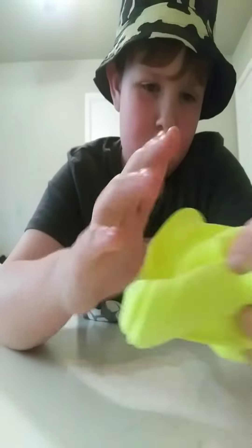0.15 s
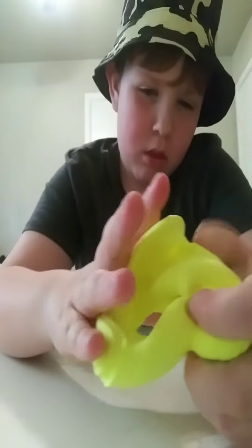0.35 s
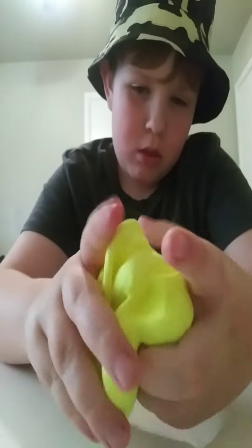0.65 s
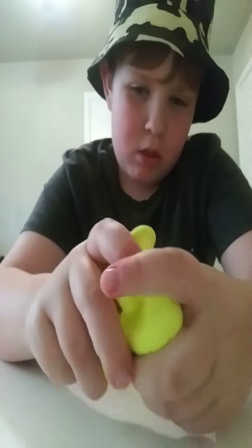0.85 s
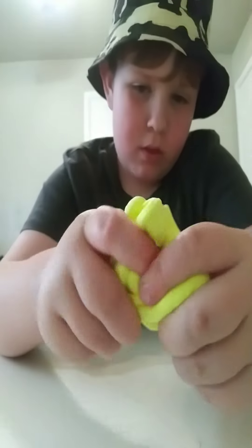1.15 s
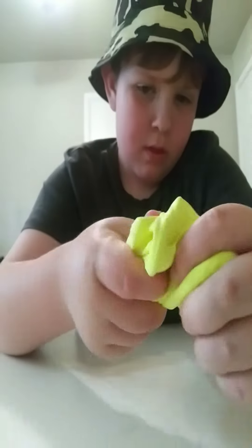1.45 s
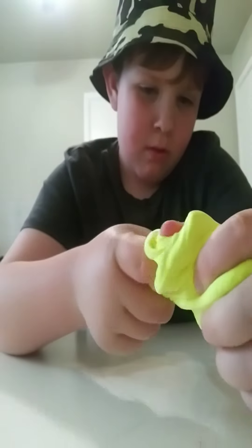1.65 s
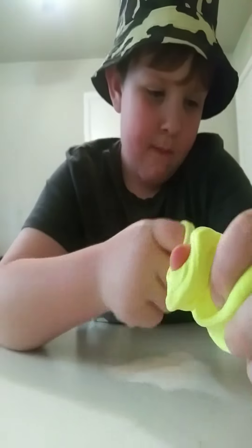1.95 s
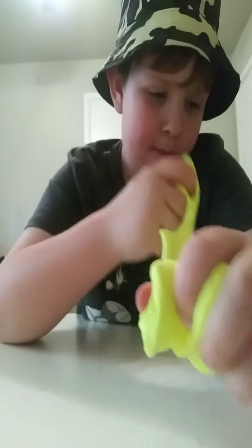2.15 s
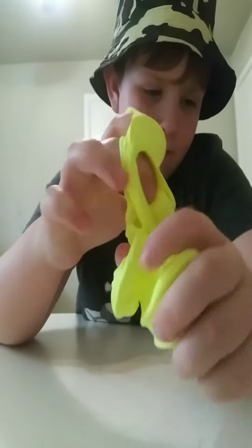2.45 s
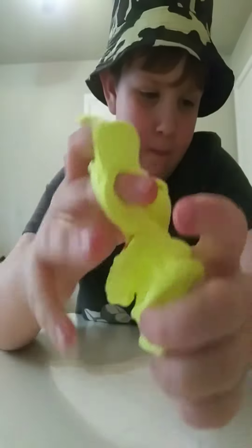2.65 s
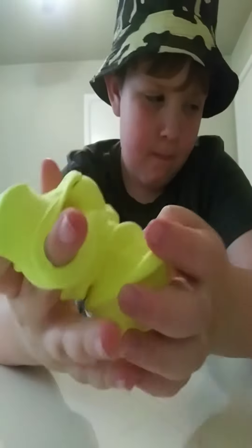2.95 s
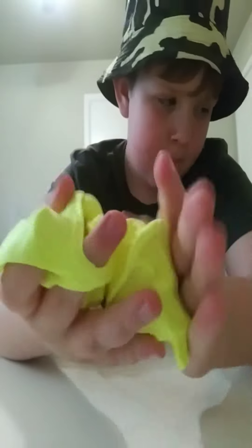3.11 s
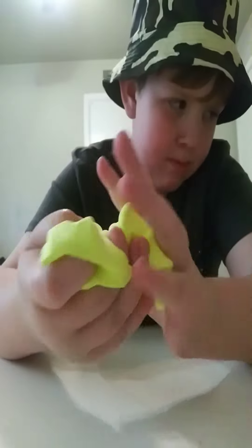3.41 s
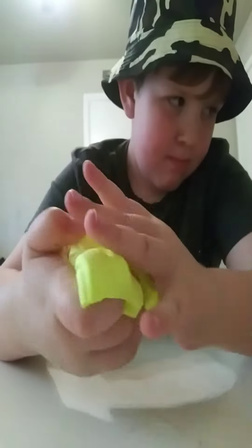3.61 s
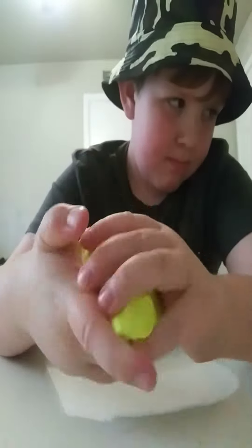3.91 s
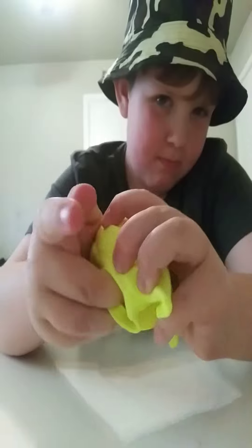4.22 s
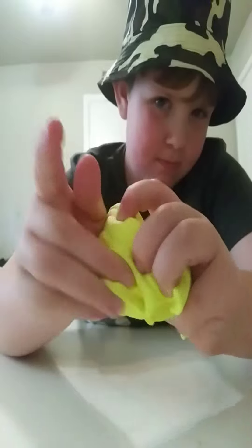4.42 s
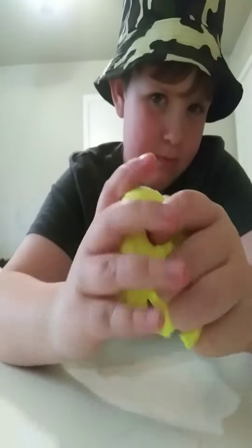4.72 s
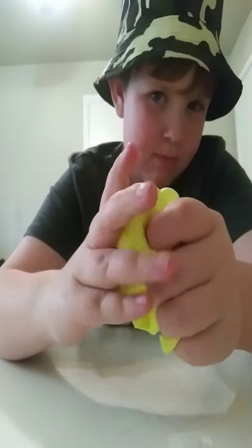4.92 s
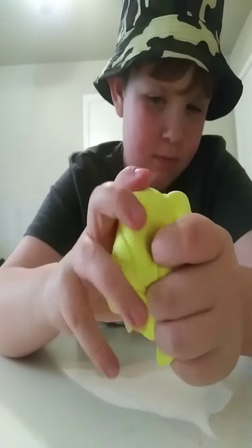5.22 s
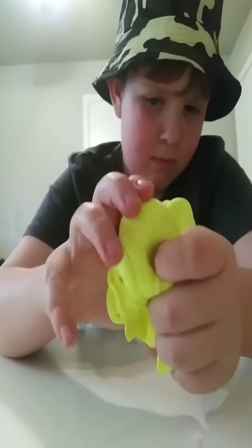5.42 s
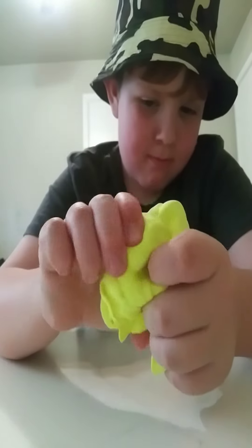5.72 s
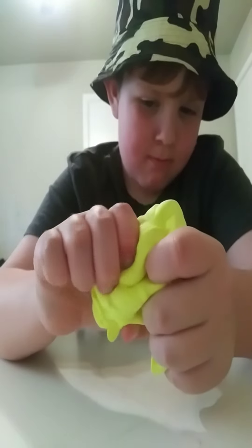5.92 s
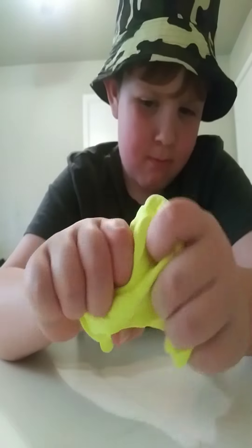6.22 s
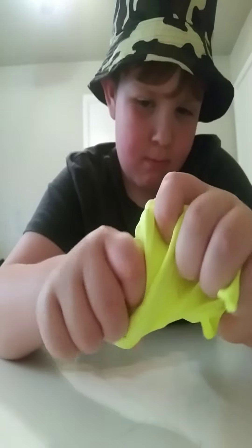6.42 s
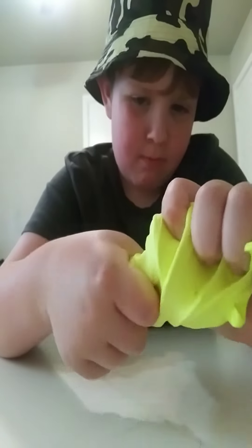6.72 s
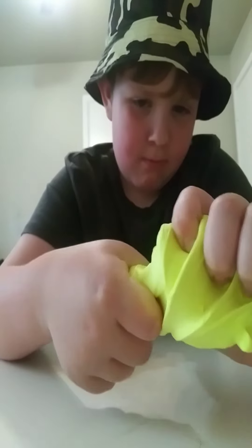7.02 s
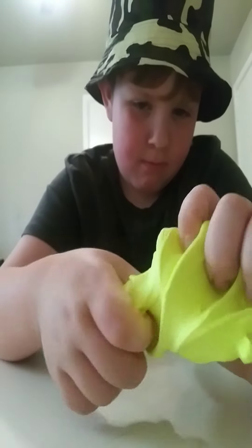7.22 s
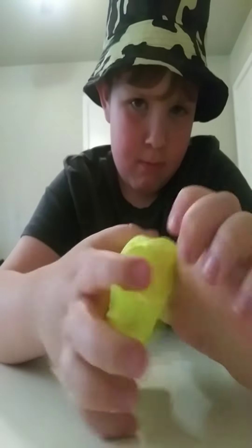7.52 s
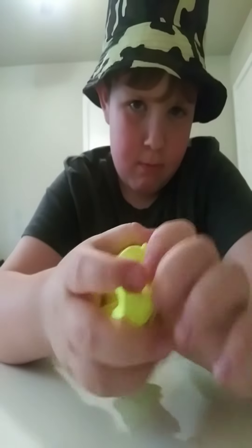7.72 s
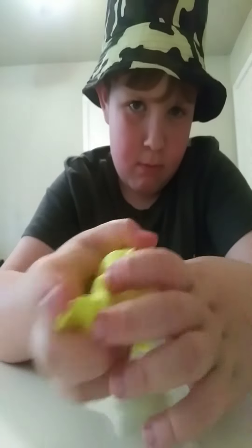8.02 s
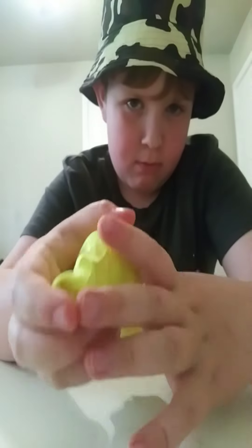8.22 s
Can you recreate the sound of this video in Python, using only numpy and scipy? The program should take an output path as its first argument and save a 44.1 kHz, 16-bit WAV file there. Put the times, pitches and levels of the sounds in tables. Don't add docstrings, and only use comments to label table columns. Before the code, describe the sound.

Hands knead a soft wet lump of slime on a table, with deep muffled thuds, dull wet slaps and small pops, very close.

```python
import sys
import numpy as np
from scipy import signal
from scipy.fft import rfft, irfft
from scipy.io import wavfile
from scipy.ndimage import uniform_filter1d

SR = 44100
rng = np.random.default_rng(int(sys.argv[2]) if len(sys.argv) > 2 else 0)


def transcribe(u):
    v = np.clip(np.atleast_2d(u).T, -1, 1)
    q = np.round(v * 32767).astype(np.int16)
    wavfile.write(sys.argv[1], SR, q)


def invert_db(x):
    u = np.asarray(x, float) / 20
    return 10 ** u


N = 368233

# (time [s], peak level [dB], pitch [Hz], room level [dB])
NUDGES = [(.009, -45.5, 87, -2.5), (0.375, -50.5, 88, -8), (0.538, -49.5, 88.5, -7.5),
          (0.721, -44.5, 94.3, -7.5), (.797, -39.5, 88, -6), (1.185, -40, 70, 0), (1.438, -39, 95, -5),
          (1.775, -47.5, 103, -9), (1.93, -51, 100, -20), (2.0626, -31, 75.3, -2), (2.158, -43, 106, -2),
          (2.29, -40.5, 97.4, -7), (3.255, -38.5, 89.6, -2.5), (3.601, -36, 77.4, -3),
          (4.024, -43, 85.4, -9), (4.109, -41, 79, -7), (4.44, -42, 93, -6.5), (5.468, -43.5, 103, -1),
          (5.506, -36, 64.4, -6.5), (5.577, -38.5, 82, -18), (5.748, -43.5, 93, -11), (6.03, -43, 86, -7),
          (6.102, -46, 83, -4.5), (6.249, -50, 71, -24), (6.331, -49, 99, -2), (6.467, -41, 91.5, -18),
          (6.588, -44.5, 88.4, -10), (6.927, -37.5, 90.5, -4), (7.329, -37, 74.98, -9),
          (7.597, -44, 100.6, -18)]
# (time [s], peak level [dB], pitch [Hz], room level
# [dB])
BUMPS = [(0.223, -35, 106, -7), (0.897, -52, 131, -27), (1.238, -34, 87.4, -4), (1.291, -32, 116.7, -10.5),
         (1.702, -39.5, 98.6, -11), (2.105, -32, 81, -6), (2.866, -36, 90.9, 1.5),
         (2.922, -29.5, 107.7, -18.5), (3.163, -34, 116.6, -4.5), (3.664, -28, 102, -12),
         (4.6, -38.5, 90, -17), (4.63, -16.5, 99.5, -22), (4.695, -39, 127.3, 3.5), (4.814, -25, 101, -14),
         (5.026, -29.5, 113, -12.5), (5.201, -48.5, 82, -8), (6.525, -34.5, 101, -12.5),
         (6.7216, -17, 84.5, -12.5), (6.7723, -26, 107, -19.5), (6.849, -36.5, 94.3, -11.5),
         (7.295, -51.5, 90, -9), (5.37, -55.5, 61.4, -3), (7.405, -29.5, 88.4, -13),
         (7.436, -32.5, 97.6, -10), (7.537, -27.5, 102, -13.5), (7.889, -52, 72.4, -15),
         (8.15, -54, 80, -6)]
# (time [s], peak level [dB], pitch [Hz], swell time [s])
KNOCKS = [(.227, -37.5, 240, 0.01), (.874, -54, 167, 0.012), (.915, -35, 192, 0.0062),
          (1.242, -38, 196, 0.0051), (1.295, -29.5, 215, 0.0056), (1.368, -47.5, 167, 0.011),
          (1.699, -48.5, 214, 0.0088), (1.779, -65, 250, .008), (2.114, -42, 170, .006),
          (2.868, -34, 203, 0.006), (2.927, -33, 240, 0.0099), (3.159, -24.5, 170, .0043),
          (3.668, -41, 225, 0.011), (4.634, -23.5, 231.6, 0.0082), (4.702, -32.5, 172.5, 0.0042),
          (4.758, -46, 166, .006), (4.822, -32, 233, 0.0067), (4.931, -57, 178, .0054),
          (5.027, -37, 240, 0.008), (6.529, -38.5, 167, 0.0041), (6.726, -23.5, 219, 0.0065),
          (6.776, -27.5, 221, 0.0075), (6.797, -43, 237, 0.0091), (6.853, -50.5, 165, .006),
          (7.093, -51, 219, 0.01), (7.409, -40.5, 240, 0.013), (7.44, -41, 170, 0.0047),
          (7.541, -32.5, 241, 0.0085), (7.894, -47.5, 240, 0.0082)]
NUDGE_SWELL_S, BUMP_SWELL_S = 0.012, 0.013
ROCK_HZ, ROCK_DB, ROCK_SWELL_S = 49.3, -15.5, 0.024
KNOCK_ROOM_DB, DRIER_PER_DB, CARRY_DB_PER_OCT = -10.5, 0.18, 3.5

# (time [s], peak level [dB], lowest mode [Hz],
# reach above it [octaves], room level [dB])
SLAPS = [(.002, -54, 371, 2.5, -5), (.916, -47.5, 387, .1, -27), (1.295, -41, 347, .15, -6.5),
         (2.033, -49, 397, .3, -1.5), (2.16, -49, 480, 0.36, -6.5), (2.871, -45, 315, 0.27, -11),
         (2.926, -50.5, 325, 0.46, -14), (3.162, -35, 370, .2, -11.5), (3.668, -55, 312, .3, -10),
         (4.633, -41, 365, 1.86, -10), (4.822, -49, 340, .3, -21), (5.027, -54, 366, .3, -15),
         (6.727, -31.5, 358, 2.5, -11.5), (6.774, -49.5, 357, 0.51, -0.5), (7.543, -55, 366, 0.64, -13)]
# (ratio to lowest mode [1], level [dB], swell time [s])
LUMP_MODES = [(1, 1.5, 0.0043), (2, -3.5, 0.0031), (2.44, -3.5, 0.0042), (3.3, -10.5, 0.0027),
              (4.27, -15, 0.0011), (5.3, -10, 0.0018), (7.65, -33, 0.0038)]
# (time [s], peak level [dB], pitch [Hz], room level
# [dB])
POPS = [(.2932, -68, 1900, -2), (.2947, -73, 1360, 4), (1.295, -45.5, 514, -26),
        (4.6318, -54.5, 1380, -3.5), (6.727, -59.5, 1585, 1), (2.033, -47.5, 906, -8), (2.16, -46, 600, -7),
        (2.161, -48, 874, -5), (2.927, -71, 740, -11), (4.633, -68.5, 1900, -11), (4.816, -61.5, 734, -5),
        (5.026, -58, 810, -10), (7.539, -56.5, 820, -18), (.001, -63, 1480, -3), (2.898, -74, 1090, -8),
        (3.161, -36.5, 518, -22), (3.162, -41, 277, 5), (6.728, -66, 2850, -14.5), (4.633, -35.5, 790, -10),
        (3.162, -61, 810, 2), (6.524, -69, 1150, -5.5), (6.529, -53.5, 595, -14), (2.871, -72, 853, -8),
        (7.435, -69, 860, 1), (7.896, -62.5, 2180, -2), (7.9004, -67, 2600, -6), (7.9009, -55, 1740, -8),
        (7.9009, -57, 2050, -10), (7.9144, -61, 1940, -19), (7.9394, -65, 2000, -10)]
# (time [s], peak level [dB], pitch [Hz],
# swell time [s])
SQUEAKS = [(.312, -74, 1820, 0.0096), (1.107, -74.5, 1510, 0.011), (1.143, -78.5, 1570, .018),
           (1.148, -58, 614, 0.01), (1.19, -68, 580, .012), (1.815, -68.5, 950, 0.0096),
           (1.913, -66, 450, 0.0054), (2.015, -73, 770, 0.0072), (2.048, -60.5, 940, 0.0096),
           (2.171, -59, 910, 0.009), (2.87, -66, 693, 0.013), (3.421, -74, 1090, .0054),
           (7.555, -63, 860, 0.0069), (3.362, -68, 1740, .006), (2.157, -67.5, 1626, 0.0057),
           (3.362, -63, 1150, 0.0094), (6.703, -58.5, 950, .0054), (6.71, -47, 1100, .007),
           (6.711, -57.5, 1640, .0049), (6.712, -62, 1970, 0.011), (6.742, -53, 1100, 0.0094),
           (6.772, -53.5, 650, .0087), (6.8, -75, 1940, 0.0075), (6.76, -68, 1550, .006),
           (6.828, -66, 946, 0.0054), (6.54, -64.5, 640, 0.01), (4.632, -35.5, 340, 0.0087),
           (3, -66, 440, 0.013), (7.8954, -63, 1266, 0.012), (7.925, -62, 1830, 0.0065)]
BEYOND_DB_PER_OCT = -41
WETTER_DB_PER_OCT = 1.5
POP_SWELL_S, POP_QUICKER = 0.0034, 0.14
SQUEAK_ROOM_DB = -7.5
SOFTNESS = 4

# (time [s], shake level [dB])
LEAN = [(0.0, -62), (1.23, -60), (1.35, -57), (2.0, -57.5), (2.23, -47.5), (2.42, -60), (2.86, -61),
        (3.14, -54.5), (3.42, -55), (4.47, -62.5), (4.84, -47), (5.28, -60), (6.42, -59.5), (6.77, -52),
        (7.28, -60.5), (7.49, -60), (7.84, -63), (8.35, -58)]
# (pitch [Hz], width [Hz], level [dB])
LOW_MODES = [(60.5, 25, -3.5), (96.6, 17.3, -5), (123.8, 18, -10), (170, 13.6, -11.5)]
# (pitch [Hz], width [Hz], level [dB])
UPPER_MODES = [(240, 21, 4.5), (303.5, 83, -5), (335, 34, -9), (435, 120, -13.5)]
UNEVEN_DB = [
    [4.5],
    [4],
]
UPPER_DB, UPPER_FOLLOW = -20.5, 0.43
OPENING_DB, OPENING_FALL_DB_PER_S = -32, 241

# (frequency [Hz], time to fall 60 dB [s])
ROOM_DECAY = [(60, 0.64), (250, 0.21), (800, 0.27), (2000, 0.25), (6000, 0.26)]
WALL_S, WALL_SPREAD_S = 0.063, 0.014
# (frequency [Hz], density [dB per Hz])
HISS = [(120, -20), (200, -8.5), (215, -3), (253, -14), (399, -14), (617, -16), (3110, -23), (7440, -25),
        (14600, -25), (15400, -26)]
HISS_DB = -76
LOW_CUT_HZ, EDGE_HZ = 61, 15500


def evened(x):
    return x / np.sqrt(np.mean(x ** 2) + 1e-20)


def read(points, hz):
    f, value = np.transpose(points)
    return np.interp(np.log(hz + 1), np.log(f + 1), value)


def add(mix, s, sound):
    part = mix[max(round(s * SR), 0):][:len(sound)]
    part += sound[:len(part)]


def ring(hz, swell, order):
    t = np.arange(SR // 4) / SR
    u = t / np.clip(swell, 0.0006, 0.04)
    envelope = (u * np.exp(1 - u)) ** order
    return -envelope * np.sin(2 * np.pi * hz * t)


def room(x, gap, build, wall):
    taps = np.zeros(SR // 2)
    at = np.arange(0, len(taps) - 20, 20)
    taps[at + rng.integers(0, 20, len(at))] = rng.choice([-1., 1.], len(at))
    hz, t, z = signal.stft(taps, SR, nperseg=512)
    decay = invert_db(-60 * t / read(ROOM_DECAY, hz)[:, None])
    tail = signal.istft(z * decay, SR, nperseg=512)[1]
    t = np.arange(len(tail)) / SR
    onset = np.clip((t - gap) / build, 0, 1)
    answer = 1 + wall * np.exp(-((t - WALL_S) / WALL_SPREAD_S) ** 2)
    tail = tail * onset * answer
    return signal.fftconvolve(x, tail / np.linalg.norm(tail))[:N]


def struck(events, softness, brief, gap, build, wall):
    direct, late = np.zeros(N), np.zeros((3, N))
    for k, (s, peak_db, hz, swell, room_db) in enumerate(events):
        add(direct, s, invert_db(peak_db + 1.0) * ring(hz, swell, softness))
        airborne = ring(hz, brief * swell, softness)
        add(late[k % 3], s, invert_db(peak_db + room_db + 3.5) * airborne)
    return direct + sum(room(x, gap, build, wall) for x in late)


def table():
    thuds = [(s, db, hz, NUDGE_SWELL_S, room_db) for s, db, hz, room_db in NUDGES]
    thuds += [(s, db, hz, BUMP_SWELL_S, room_db) for s, db, hz, room_db in BUMPS]
    rocking = [(s, db + ROCK_DB, ROCK_HZ, ROCK_SWELL_S, room_db) for s, db, _, _, room_db in thuds]
    knocks = []
    for s, db, hz, swell in KNOCKS:
        room_db = KNOCK_ROOM_DB - DRIER_PER_DB * (db + 32.5) + CARRY_DB_PER_OCT * np.log2(hz / 240)
        knocks.append((s, db, hz, swell, room_db))
    low = struck(thuds + rocking, 3.12, brief=0.63, gap=0.013, build=0.023, wall=1.0)
    return low + struck(knocks, SOFTNESS, brief=0.49, gap=0.0069, build=0.017, wall=0.45)


def lump():
    slaps = []
    for s, db, hz, reach, room_db in SLAPS:
        for ratio, mode_db, swell in LUMP_MODES:
            octaves = np.log2(ratio)
            level_db = db + mode_db + BEYOND_DB_PER_OCT * max(octaves - reach, 0)
            slaps.append((s, level_db, hz * ratio, swell, room_db + WETTER_DB_PER_OCT * octaves))
    pops = [(s, db, hz, POP_SWELL_S * (800 / hz) ** POP_QUICKER, room_db) for s, db, hz, room_db in POPS]
    squeaks = [(*row, SQUEAK_ROOM_DB) for row in SQUEAKS]
    return struck(slaps + pops + squeaks, SOFTNESS, brief=0.57, gap=0.0009, build=0.0017, wall=0.5)


def modes(x, resonances):
    hz, spectrum = np.fft.rfftfreq(len(x), 1 / SR), rfft(x)
    gain = sum(invert_db(db) / (1 + 2j * (hz - f) / width) ** 2 for f, width, db in resonances)
    return evened(irfft(spectrum * gain, len(x)))


def lean():
    t = np.arange(N) / SR
    low_db = np.interp(t, *np.transpose(LEAN))
    upper_db = UPPER_DB - (1 - UPPER_FOLLOW) * (low_db + 59.5)
    low_db = np.maximum(low_db, OPENING_DB - OPENING_FALL_DB_PER_S * t)
    drift = evened(uniform_filter1d(rng.standard_normal(N), 1500))
    pushes = rng.standard_normal((2, N)) * invert_db(np.array(UNEVEN_DB) * drift)
    tremble = modes(pushes[0], LOW_MODES) + invert_db(upper_db) * modes(pushes[1], UPPER_MODES)
    settle = 1 - 0.75 * np.exp(-t / 0.006)
    return invert_db(low_db) * tremble * settle


def hiss():
    frames, hz = N // 128 + 8, np.fft.rfftfreq(512, 1 / SR)
    a, b, patches = rng.standard_normal((frames, 257, 3)).T
    patches = uniform_filter1d(patches, 6, 0)
    patches = evened(uniform_filter1d(patches, 12, 1))
    flicker = evened(rng.standard_normal(frames))
    z = (a + 1j * b) * invert_db(read(HISS, hz)[:, None] + 1.3 * patches + 1.3 * flicker)
    return invert_db(HISS_DB) * evened(signal.istft(z, nperseg=512, noverlap=384)[1][:N])


def scene():
    return (table() + lump() + lean() + hiss())[None]


def band_limit(x):
    return signal.sosfilt(signal.butter(12, 16500, fs=SR, output="sos"), x)


def record(dry):
    low_cut = signal.butter(2, LOW_CUT_HZ, "high", fs=SR, output="sos")
    x = signal.sosfilt(low_cut, dry)
    top_cut = signal.firwin(1023, EDGE_HZ, window=("kaiser", 9), fs=SR)
    x = signal.oaconvolve(x, top_cut[None], "same")
    return band_limit(x)


dry = scene()
out = record(dry)
transcribe(out)
```